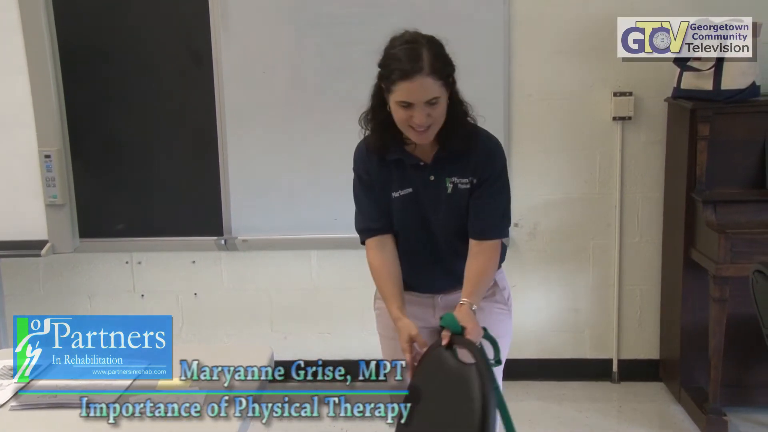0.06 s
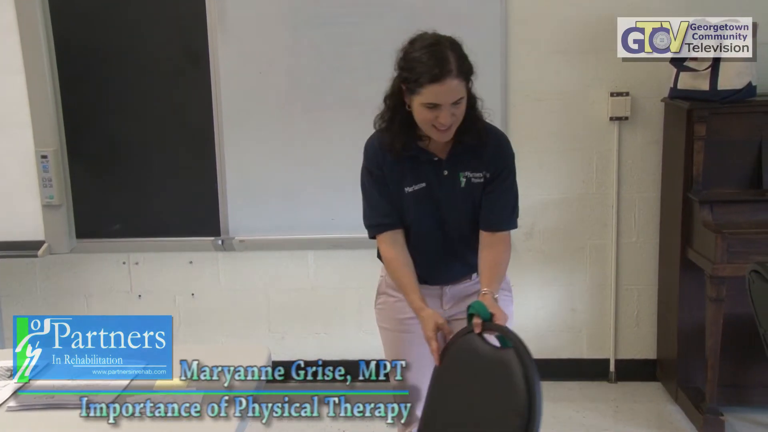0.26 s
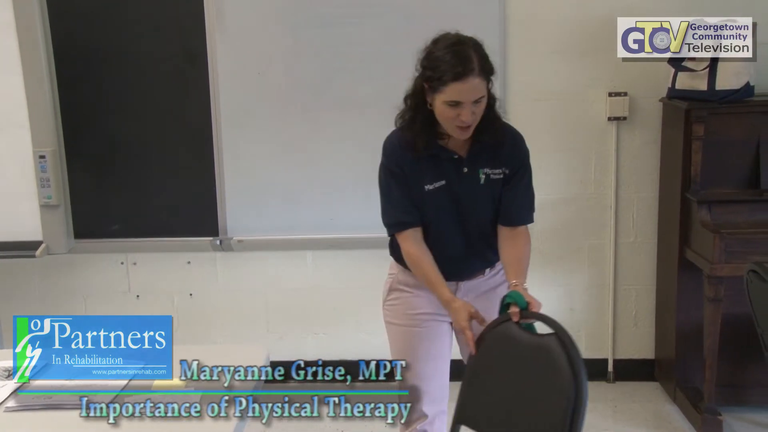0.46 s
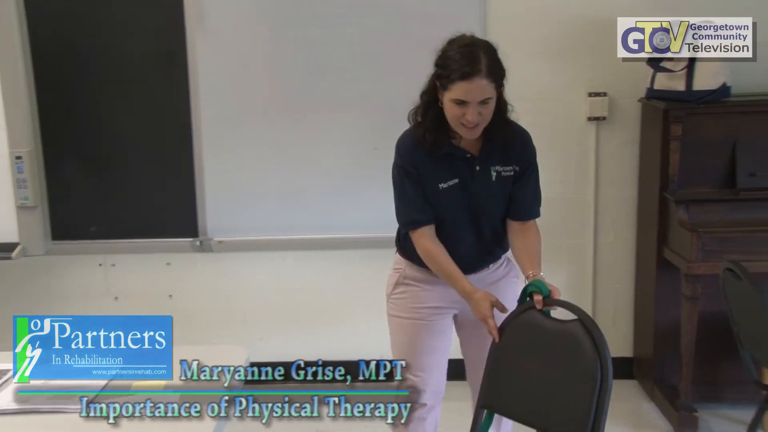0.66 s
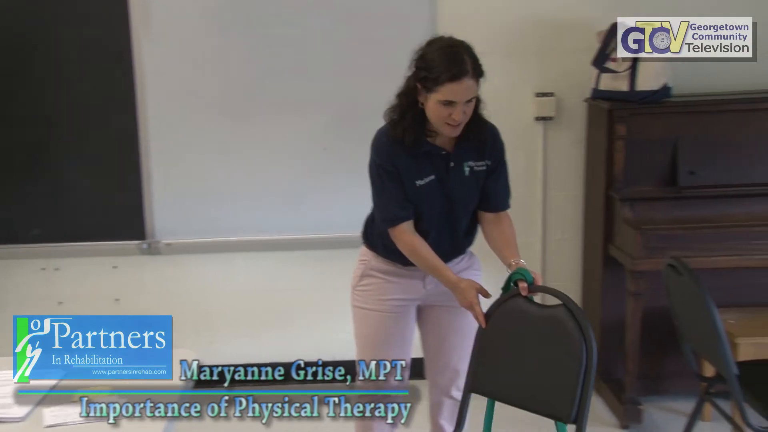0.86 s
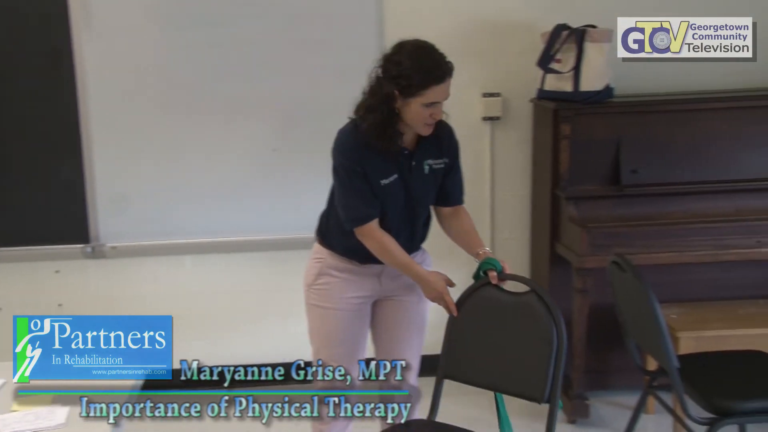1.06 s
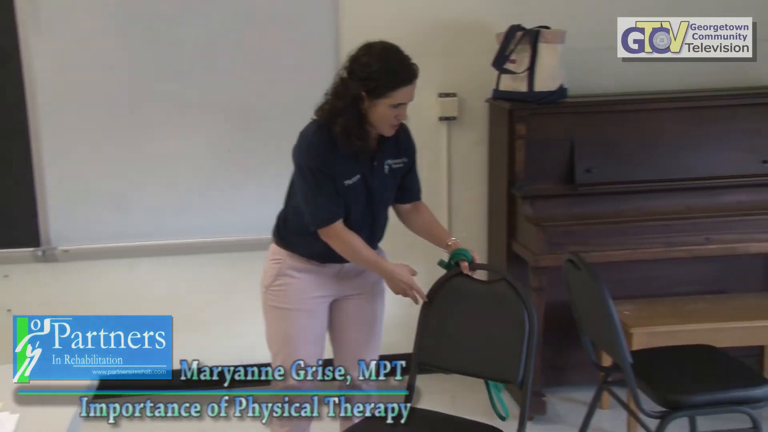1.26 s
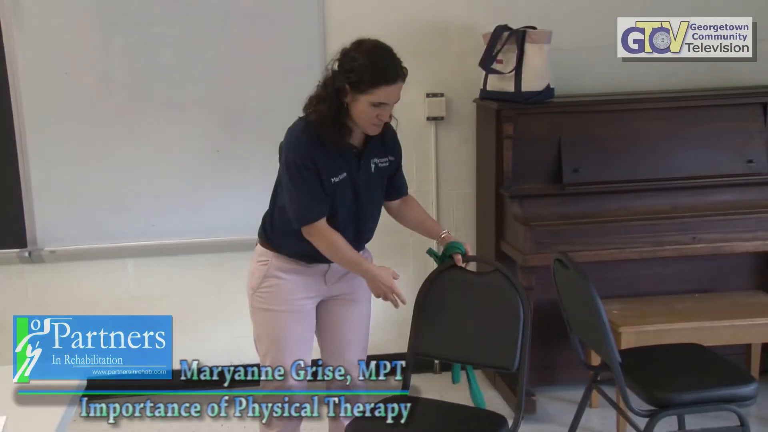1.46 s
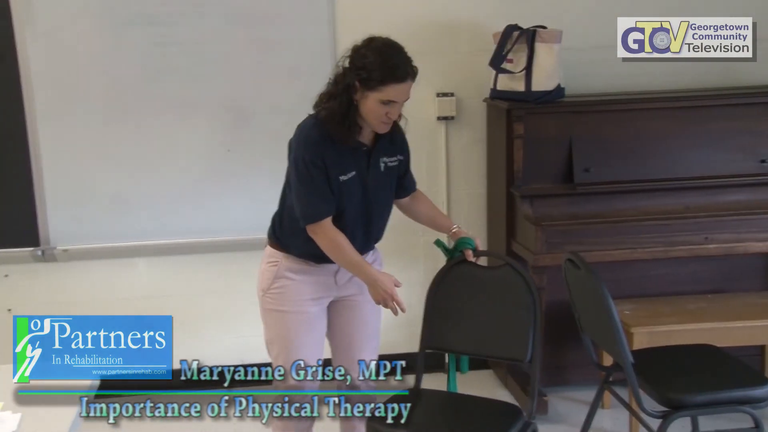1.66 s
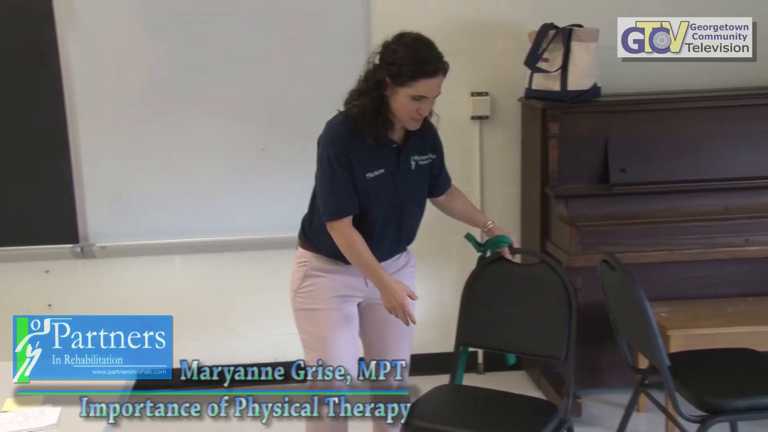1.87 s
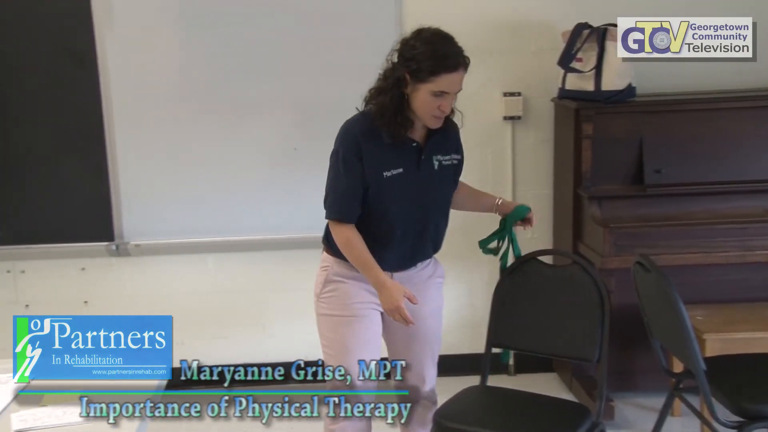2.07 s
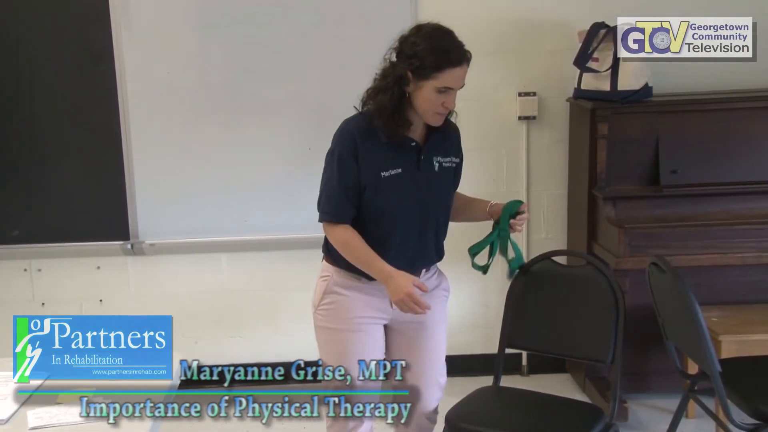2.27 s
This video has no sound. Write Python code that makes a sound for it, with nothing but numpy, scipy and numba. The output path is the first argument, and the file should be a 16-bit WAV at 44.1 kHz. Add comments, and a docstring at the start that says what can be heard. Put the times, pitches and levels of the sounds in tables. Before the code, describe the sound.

A chair is dragged across a hard classroom floor. From 0 to 0.5 seconds the scrape builds, buzzing and gritty; around 0.65 it sings out in a hollow, wavering groan. Near 0.85 it jolts with a gritty tick and dips in pitch, then groans on, strongest at 1.65 to 1.9. It stops by 2.0; the room rings briefly, then a faint rustle and slight scrape over quiet room hush.

```python
"""Chair dragged over a hard floor

A metal-legged chair slides across a classroom floor and comes to rest; the room rings out.
Rough rubbing excites frame and seat, the feet chatter in stick-slip, and grit ticks in the steel tubes.
Friction keeps one frame mode singing, with brief squeaks of other modes.
A cloth-like rustle and the start of a new slide follow, over the room's steady hush."""
import sys
import numpy as np
from scipy import signal
from scipy.io import wavfile
from scipy.ndimage import uniform_filter1d
from numba import njit

SR = 44100
rng = np.random.default_rng(int(sys.argv[2]) if len(sys.argv) > 2 else 0)


def dump(signal):
    """Clip the signal to [-1, 1] and save it as 16-bit WAV at the path in sys.argv[1]."""
    limited = np.clip(np.atleast_2d(signal).T, -1, 1)
    pcm = np.round(limited * 32767).astype(np.int16)
    wavfile.write(sys.argv[1], SR, pcm)


def makeup_ratio(level_db):
    """Linear amplitude ratio for a level in decibels (20 dB per factor of ten)."""
    decades = np.asarray(level_db, float) / 20
    return 10 ** decades


N = 101430  # samples


def curve(table, col, fade_db_s=0):
    """Linear interpolation: a table column over time; a level may fade after the last row."""
    rows = np.array(table, float)
    t = np.arange(N) / SR
    after_end = np.maximum(t - rows[-1, 0], 0)
    return np.interp(t, rows[:, 0], rows[:, col]) - fade_db_s * after_end


def unit(x):
    """Normalisation: rms 1."""
    return x / np.sqrt(np.mean(x ** 2))


def walk(rate):
    """Smoothed random modulation: levels held 1 / rate s and slewed twice; spread near 1."""
    hold = int(SR / rate)
    steps = np.repeat(rng.standard_normal(N // hold + 1), hold)
    return 1.283 * uniform_filter1d(uniform_filter1d(steps, hold), hold)[:N]


def grains(rate, spread_db):
    """Random impulse train: on average rate clicks per second, of uneven size and either sign."""
    hit = rng.random(N) < rate / SR
    return hit * rng.standard_normal(N) * makeup_ratio(spread_db * rng.exponential(size=N))


@njit
def svf(x, hz, width):
    """Second-order resonance: a state-variable band-pass with gain 1 at the centre."""
    y, band, low = np.empty(len(x)), 0., 0.
    g, k = np.tan(np.pi * hz / SR), width / hz
    for i in range(len(x)):
        v = (band + g * (x[i] - low)) / (1 + g * (g + k))
        band, low, y[i] = 2 * v - band, low + 2 * g * v, k * v
    return y


def ring(force, modes, steep=False, flicker_db=0):
    """Modal superposition: a force rings resonances; each may flicker as the contact shifts."""
    total = 0
    for k, (hz, width, db) in enumerate(modes):
        if steep:  # two wider filters in series
            mode = svf(svf(force, 1. * hz, 1.96 * width), 1. * hz, 1.96 * width)
        else:
            mode = svf(force, 1. * hz, 1. * width)
        total = total + (-1) ** k * makeup_ratio(db + flicker_db * walk(rate=22)) * mode
    return unit(total)


# Strength of the sliding contact: t/s, rubbing level/dB, upper frame rattle level/dB, floor rumble level/dB
RUBBING_LEVELS = [(0, -36, -47.5, -30.5), (.1, -33.5, -43.5, -47), (.42, -29.5, -42.5, -41),
                  (.53, -25, -35, -49), (.62, -24, -39, -40), (.78, -25, -39.5, -48),
                  (.86, -22.5, -33, -35.5), (.98, -27.5, -39.5, -40.5), (1.12, -21, -40, -38),
                  (1.3, -21, -39, -41), (1.48, -25, -43, -41), (1.67, -18, -33.5, -51),
                  (1.87, -19, -34, -56), (2.1, -54.5, -58.5, -47), (2.3, -52, -51.5, -46)]
# Resonances of frame and seat: f/Hz, nominal width/Hz, relative level/dB
FRAME_MODES = [(134, 29, -9), (252.8, 43.3, -3.5), (321.8, 38.4, -1.5), (359.8, 34.8, 2), (410.7, 38, -4),
               (489, 27.4, -7), (572.4, 98, -12)]
# Resonances of the upper parts: f/Hz, nominal width/Hz, relative level/dB
RATTLE_MODES = [(730, 41, 14.5), (890, 252, 6.5), (1012.6, 31, 16.5), (1203, 670, -5), (1660, 400, -13)]
# Resonances of the floor: f/Hz, nominal width/Hz, relative level/dB
FLOOR_MODES = [(50.6, 25, -6), (66.7, 8.8, -6.5), (104.5, 26, 1.5)]


def rubbing():
    """Roughness excitation: floor bumps shake the frame; the upper parts rattle; the floor rumbles."""
    bumps = grains(rate=4000, spread_db=1.0) * makeup_ratio(1.86 * walk(rate=26))
    knocks = grains(rate=2500, spread_db=2.5) * makeup_ratio(2.0 * walk(rate=30))
    frame = ring(bumps, FRAME_MODES, steep=True) * makeup_ratio(curve(RUBBING_LEVELS, 1))
    rattle = ring(knocks, RATTLE_MODES, steep=True) * makeup_ratio(curve(RUBBING_LEVELS, 2))
    rumble = ring(rng.standard_normal(N), FLOOR_MODES, steep=True) * makeup_ratio(curve(RUBBING_LEVELS, 3))
    return frame + rattle + rumble


# Stick-slip of the feet: t/s, level/dB, share of the half pitch from strong-weak alternation
CHATTER_LEVELS = [(0, -37.5, 0.74), (.1, -36.5, 0.81), (.22, -25.5, 0.47), (.42, -25, 0.097),
                  (.56, -29, 0.32), (.72, -45.5, 0.903), (.9, -23.5, 0.3), (1.0, -31, 0.44),
                  (1.27, -31.5, 0.1), (1.37, -25.5, 0.75), (1.6, -26.5, 1.22), (1.72, -26.5, 1.13),
                  (1.84, -21.5, 1.41), (1.92, -31, 1.64), (2.06, -35.5, 0.92)]
SLIP_HZ, SLIP_RISE_HZ = 251.7, 7  # mean rate without alternation; its rise at full alternation
SLIP_WAVER, SLIP_WAVER_DB = .004, 1.2  # spread of the rate (fraction) and of the level


def chatter():
    """Stick-slip oscillation: alternate strong and weak slips add the half pitch."""
    share = curve(CHATTER_LEVELS, 2)
    rate_hz = (SLIP_HZ + SLIP_RISE_HZ * np.minimum(share, 1)) * (1 + SLIP_WAVER * walk(rate=25))
    phase = 2 * np.pi * np.cumsum(rate_hz) / SR
    slips = np.sin(phase) + 0.15 * np.sin(2 * phase)
    alternation = np.sin(phase / 2) + 0.25 * np.sin(3 * phase / 2)
    level_db = curve(CHATTER_LEVELS, 1, fade_db_s=140) + SLIP_WAVER_DB * walk(rate=19.7)
    return (slips + share * alternation) * makeup_ratio(level_db)


# Larger grains caught under a foot: t/s, push level/dB before its onset is smoothed
LARGE_GRAINS = [(0.511, -31.5), (0.57, -36), (0.633, -37), (0.826, -27), (0.8467, -33)]


def large_grain_push():
    """Exponential relaxation: each larger grain pushes at once, then lets go within a few ms."""
    push = np.zeros(N)
    for s, db in LARGE_GRAINS:
        push[int(s * SR)] = makeup_ratio(db)
    decay = np.exp(-1 / (0.0072 * SR))  # time constant 7.2 ms
    return uniform_filter1d(signal.lfilter([1], [1, -decay], push), size=40)


# Strength of the grit: t/s, level in the tubes/dB, fine hiss level/dB
GRIT_LEVELS = [(0, -39, -43), (.05, -42.5, -43), (.08, -38.5, -36.5), (.22, -43, -41.5), (.26, -40, -37),
               (.46, -39, -41.5), (.6, -41.5, -44), (.75, -38.5, -41.5), (.81, -40, -44.5),
               (.85, -35, -40.5), (1.0, -37.5, -38.5), (1.24, -42.5, -44.5), (1.4, -41, -43.5),
               (1.65, -50, -53), (1.77, -42, -50.5), (2.02, -70, -68), (2.09, -69, -65.5),
               (2.115, -57.5, -51.5), (2.18, -55, -58), (2.25, -47.5, -52), (2.3, -39.5, -55)]
# Resonances of the steel tubes: f/Hz, nominal width/Hz, relative level/dB
TUBE_MODES = [(1707, 560, -2.5), (2571, 47, 8), (2467, 450, -6.5), (3204, 225, -5.5), (4470, 89, 4),
              (4500, 1300, -10.5), (5190, 56, -2)]
# Bands of the fine hiss: f/Hz, nominal width/Hz, relative level/dB
HISS_BANDS = [(6040, 1440, -4), (7050, 600, 2.5), (7910, 980, -3.5), (9800, 6400, -22), (12100, 1300, -33),
              (13800, 1000, -45)]
TUBE_FLICKER_DB = 1.6


def grit():
    """Impulsive excitation: dense grit rings the tubes and hisses; larger grains push harder."""
    flicker_db = 0.56 * walk(rate=40)
    push = large_grain_push()
    tubes = ring(grains(rate=7100, spread_db=1.5), TUBE_MODES, steep=True, flicker_db=TUBE_FLICKER_DB)
    hiss = ring(grains(rate=11000, spread_db=0.0), HISS_BANDS, steep=True)
    tubes = tubes * (makeup_ratio(curve(GRIT_LEVELS, 1) + flicker_db) + push / 2)
    return tubes + hiss * (makeup_ratio(curve(GRIT_LEVELS, 2) + flicker_db) + makeup_ratio(-5.5) * push)


# Spectrum of the room's air: f/Hz, relative level per Hz/dB
HUSH_SPECTRUM = [(25, -22.5), (120, 6), (270, -3), (700, -7.5), (2000, -15), (5000, -22.5)]
HUSH_DB = -46  # rms over both channels


def hush():
    """Stationary noise: steady air of the room, alike left and right in the bass."""
    spectrum, out = np.array(HUSH_SPECTRUM), 0
    for hz in 30 * 2 ** np.arange(0, 7.6, .5):  # half-octave steps
        mid, side = (svf(svf(rng.standard_normal(N), hz, hz / 2), hz, hz / 2) for _ in range(2))
        db = np.interp(np.log(hz), np.log(spectrum[:, 0]), spectrum[:, 1])
        spread = min(hz / 1000.0, .4) * side * np.array([[1], [-1]])
        out = out + makeup_ratio(db) * (mid + spread)
    return unit(out) * makeup_ratio(HUSH_DB)


# Main frame mode kept singing by the friction: t/s, f/Hz, level/dB
SINGING_TONE = [(0, 386.9, -47), (.15, 368.8, -27), (.55, 371.7, -24), (.65, 370.4, -14),
                (.77, 378.2, -22.5), (.83, 366, -27.5), (.89, 318, -19), (.97, 298, -29.5),
                (1.04, 362, -20), (1.24, 366, -17), (1.4, 335.1, -28.5), (1.52, 382, -21),
                (1.68, 355, -15.5), (1.85, 370.6, -17), (2.0, 392.8, -47.5)]
SING_WAVER = .014  # spread of the pitch (fraction)


def singing():
    """Self-excited vibration: friction feeds the main mode, a tone of wavering pitch and level."""
    pitch_hz = curve(SINGING_TONE, 1) * (1 + SING_WAVER * walk(rate=49))
    phase = 2 * np.pi * np.cumsum(pitch_hz) / SR
    return np.sin(phase) * makeup_ratio(curve(SINGING_TONE, 2, fade_db_s=410) + 0.68 * walk(rate=35))


# Modes that stand out for a while: centre t/s, time from centre to 1/e/s, f/Hz, level/dB
SQUEAK_MODES = [(0.26, 0.29, 188, -38), (0.551, 0.047, 1235, -37), (0.57, 0.096, 780, -37.5),
                (0.695, 0.065, 729, -38.5), (0.88, 0.043, 1298, -41.5), (1.191, 0.04, 986, -37.5),
                (0.547, 0.046, 1410, -46), (1.673, 0.056, 760, -34)]
SQUEAK_Q = 75  # nominal


def squeaks():
    """Narrow-band resonance: the rubbing shakes one lightly damped mode that swells and fades."""
    out, t = np.zeros(N), np.arange(N) / SR
    for s, length, hz, db in SQUEAK_MODES:
        swell = makeup_ratio(db) * np.exp(-((t - s) / length) ** 2)
        out = out + swell * ring(rng.standard_normal(N), [(hz, hz / SQUEAK_Q, 0)], steep=True)
    return out


@njit
def walls(x, lags, gain, damp):
    """Reverberation: eight delay lines that feed each other, duller on every round."""
    line, soft, out = np.zeros((8, 4096)), np.zeros(8), np.zeros((2, len(x)))
    for i in range(len(x)):
        total = 0.
        for k in range(8):
            soft[k] += (1 - damp) * (gain[k] * line[k, (i - lags[k]) & 4095] - soft[k])
            total += soft[k]
            out[k % 2, i] += soft[k]
        for k in range(8):
            line[k, i & 4095] = x[i] + soft[k] - total / 4
    return out


ROOM_T60_S, ROOM_DAMP, ROOM_DB = 0.73, 0.29, -12  # decay time in the bass, treble loss, echo gain
LEFT_DB = -0.94  # left gain relative to right


def scene():
    """Linear superposition: the chair, its echo from the walls, and the hush."""
    chair = rubbing() + chatter() + grit() + singing() + squeaks()
    lags = np.array([661, 853, 1031, 1259, 1493, 1777, 2053, 2389])  # samples
    wet = makeup_ratio(ROOM_DB) * walls(chair, lags, makeup_ratio(-60 * lags / SR / ROOM_T60_S), ROOM_DAMP)
    side = (wet[0] - wet[1]) / 2
    side = side - svf(side, 90., 620.0)  # less left-right difference in the bass
    mid = chair + wet.mean(axis=0)
    left = (mid + side) * makeup_ratio(LEFT_DB / 2)
    right = (mid - side) * makeup_ratio(-LEFT_DB / 2)
    return np.array([left, right]) + hush()


def top_cut(x):
    """Nothing passes above the cut-off."""
    return signal.sosfilt(signal.butter(12, 15720, fs=SR, output="sos"), x)


NOTCH_HZ, NOTCH_WIDTH_HZ, NOTCH = 3700., 220., 0.52  # NOTCH: fraction removed at the centre


def record(dry):
    """Transducer response: the microphone has a dip in the presence range and rounds peaks."""
    dipped = np.array([c - NOTCH * svf(c, NOTCH_HZ, NOTCH_WIDTH_HZ) for c in dry])
    mix = np.tanh(1.233 * dipped) / 1.374
    return top_cut(mix)


dry = scene()
out = record(dry)
dump(out)
```